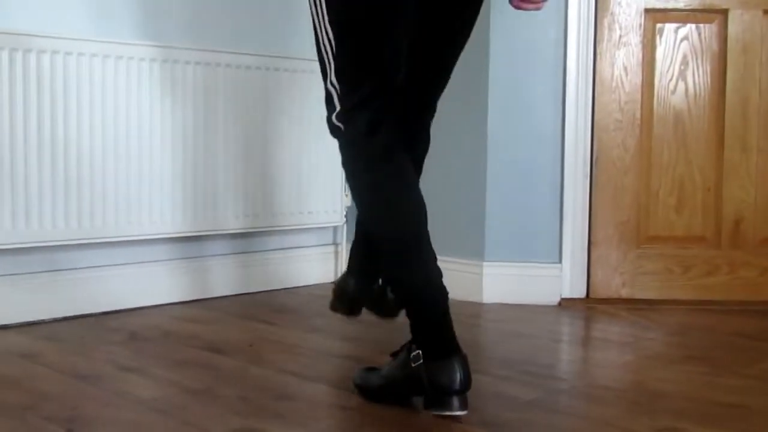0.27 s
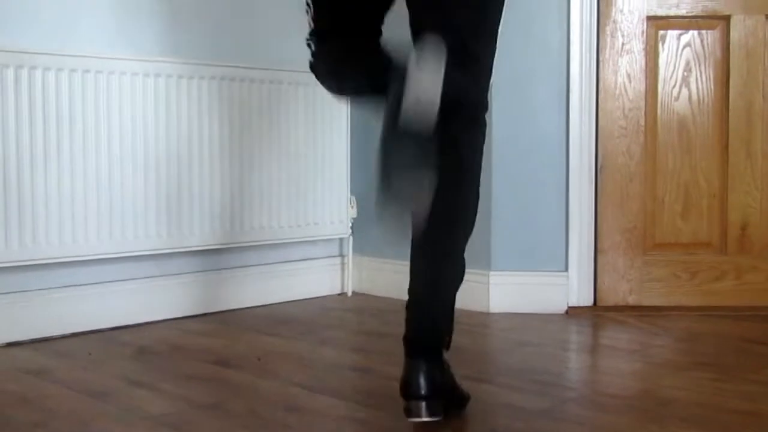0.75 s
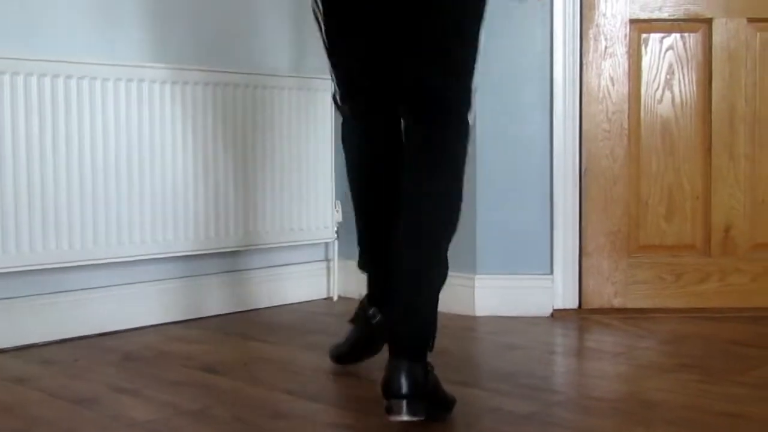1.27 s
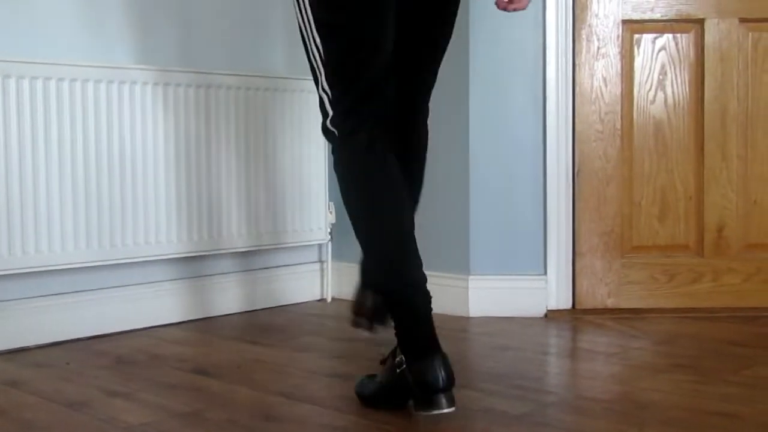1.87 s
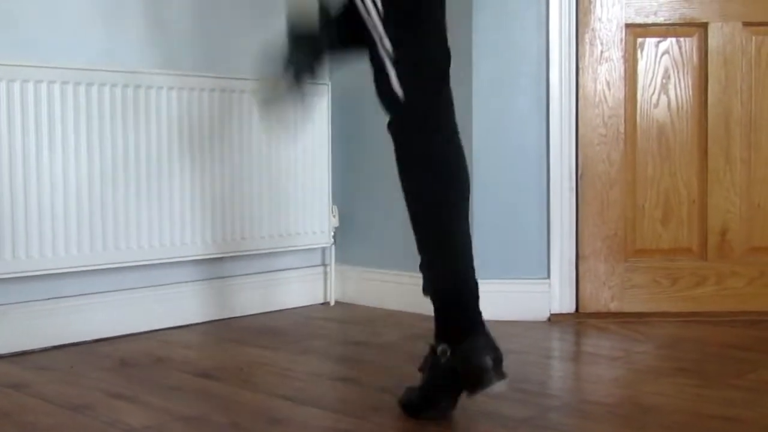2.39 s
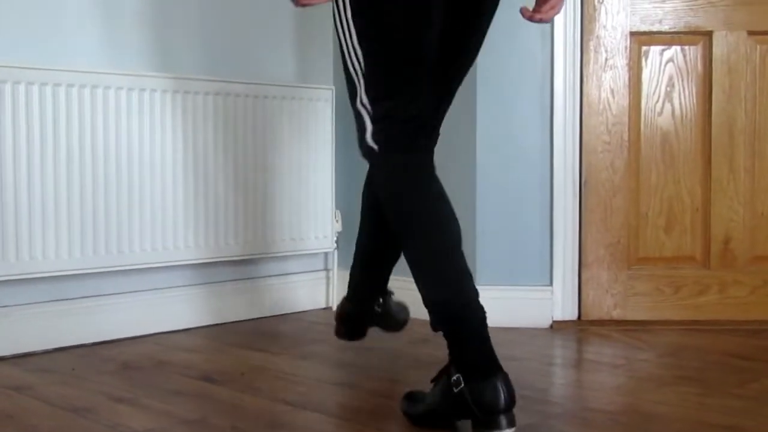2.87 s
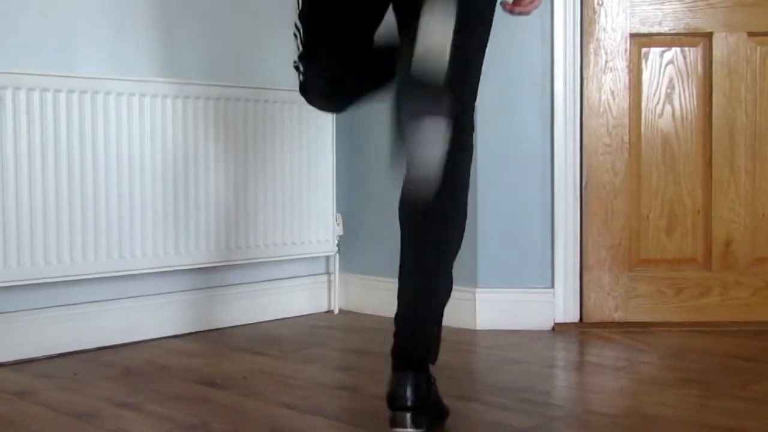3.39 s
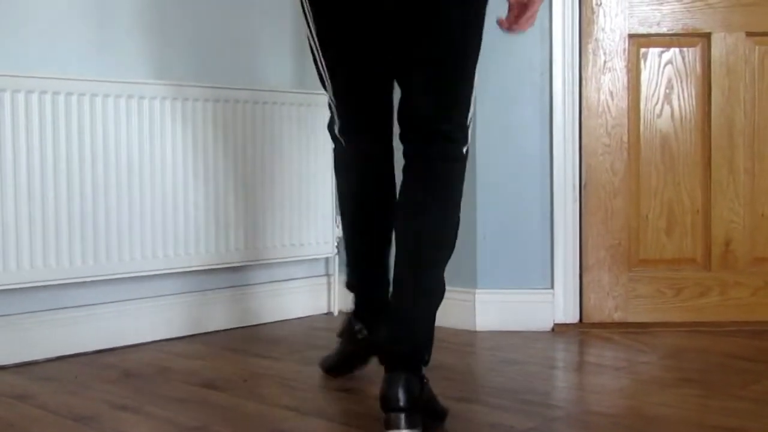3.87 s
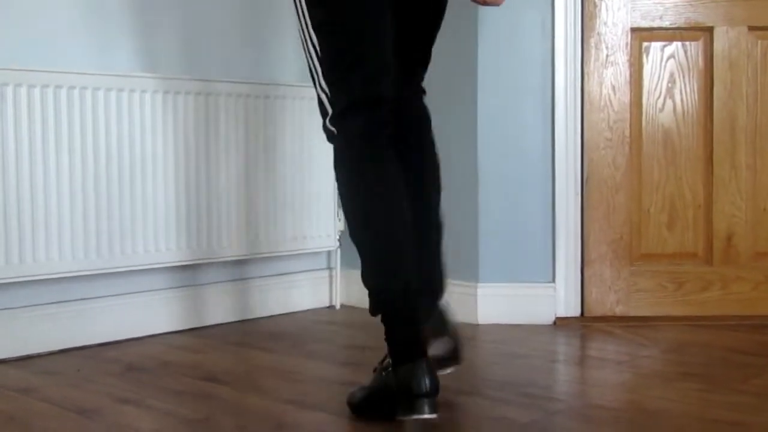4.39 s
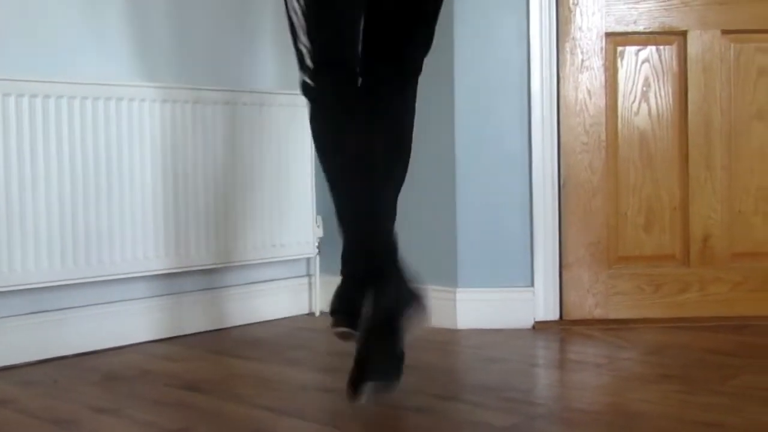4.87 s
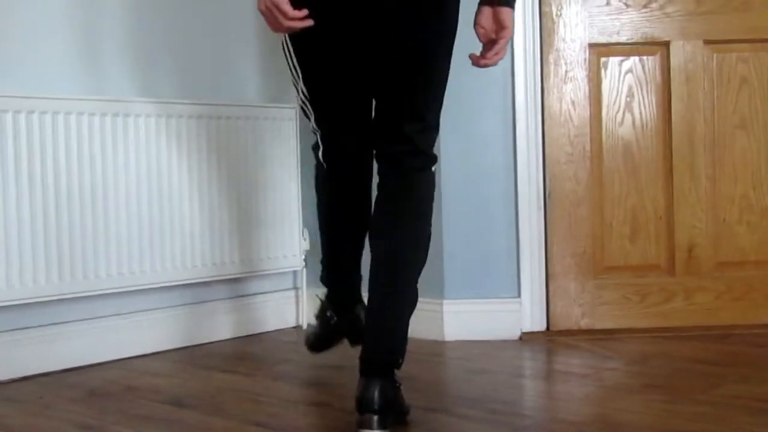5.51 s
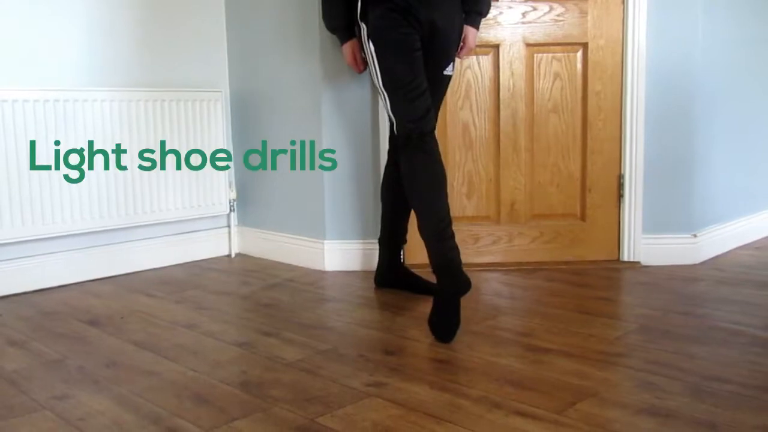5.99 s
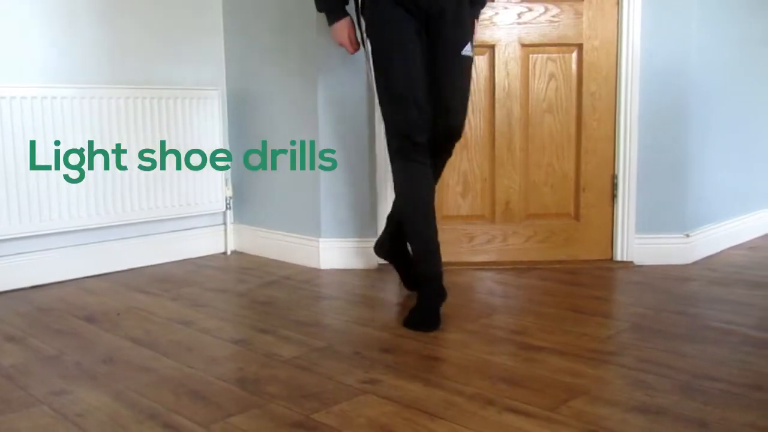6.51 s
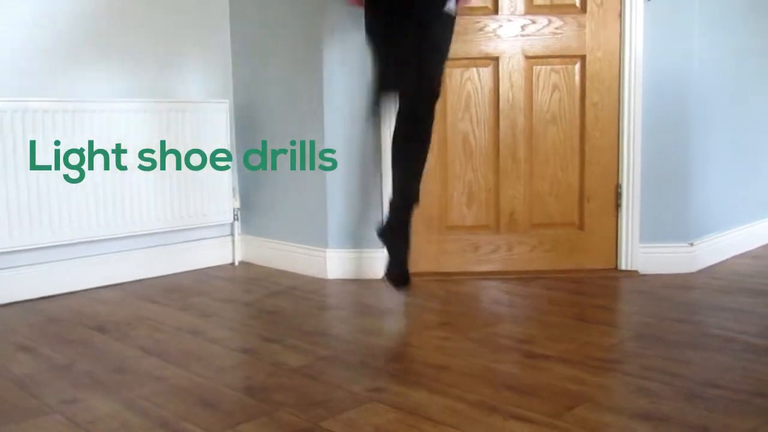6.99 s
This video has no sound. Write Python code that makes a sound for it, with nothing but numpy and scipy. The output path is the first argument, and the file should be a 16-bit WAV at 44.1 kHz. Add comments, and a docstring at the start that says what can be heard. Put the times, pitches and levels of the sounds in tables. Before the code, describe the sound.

A dancer in hard-soled shoes works on a wooden floor in a small, bare, reverberant room. From 0 to 5.5 seconds, loud single blows fall evenly about every 0.3 seconds: hollow stamps and steps, crisp heel and toe clacks, and gritty slaps around 1.8 and 5.3. A longer crunching scrape follows the clicking blow at 2.4. Soft footfalls, brief scuffs and airy trouser swishes come between beats, with duller landings near 1.5 and 4.2. Each blow leaves a boxy tail of about half a second. At 5.5 the sound cuts to dead silence. At 5.7 a slightly brighter hush and faint hum return, with tiny rapid paired ticks until 6.15. Around 6.45 a sock slides softly, then a low muffled landing and small thuds come at 6.6 to 6.7. A light touch at 6.9, faint rubbing and a fuller soft thump at 7.2 end it, heard through a small, bass-thin microphone.

```python
"""In a small, bare room with a wooden floor, a dancer in hard-soled shoes beats an even step.
Each blow rings floor and shoe through resonances: tips clack, flat stamps boom and crunch.
Between the beats feet scuff and trouser legs swish, made of noise with a smooth swell.
After a moment of dead silence there is a faint ticking; the dancer, now in socks, slides a foot out,
springs and lands softly. A steady hush and a little hum lie underneath."""
import sys
import numpy as np
from scipy import signal
from scipy.fft import rfft, irfft
from scipy.io import wavfile
from scipy.ndimage import uniform_filter1d

SR = 44100
rng = np.random.default_rng(int(sys.argv[2]) if len(sys.argv) > 2 else 0)


def output_pcm(signal):
    """Save a mono or channel-first signal as 16-bit PCM at the path in sys.argv[1].

    Samples are clipped to [-1, 1] before scaling.
    """
    pcm = np.clip(np.atleast_2d(signal).T, -1, 1) * 32767
    wavfile.write(sys.argv[1], SR, np.round(pcm).astype(np.int16))


N = 319725
SIZE = 32768  # samples in each single sound and each spectrum
HZ = np.maximum(np.arange(SIZE // 2 + 1) * SR / SIZE, 1)
AGE = np.arange(SIZE) / SR  # seconds since a sound began
TIME = np.arange(N) / SR  # seconds since the scene began


def from_db(db):
    """Turn decibels into a gain."""
    return 10 ** (np.asarray(db) / 20)


def unit(x):
    """Scale a sound to an energy of one."""
    return x / np.sqrt(np.sum(x ** 2) + 1e-20)


def fade(t60):
    """Exponential decay that loses 60 dB in t60 seconds."""
    return np.exp(-np.log(1000) * AGE / t60)


def add(track, s, sound):
    """Mix a sound into the track from second s on."""
    start = int(np.clip(round(s * SR), 0, N - 1))
    track[start:start + len(sound)] += sound[:N - start]


def hump(hz, q):
    """Gain over frequency of a resonance applied twice; a higher q makes it narrower."""
    return 1 / (1 + (q * (HZ / hz - hz / HZ)) ** 2)


def causal(gain):
    """Minimum-phase spectrum with this gain: a sharp front, then the ring."""
    cepstrum = irfft(np.log(gain + 1e-5))
    # fold the second half onto the first, so that nothing sounds before the front
    cepstrum[1:SIZE // 2] *= 2
    cepstrum[SIZE // 2 + 1:] = 0
    return np.exp(rfft(cepstrum))


# Blows of the shoes on the floor. Each row: start in seconds, weight on the boards in dB,
# clack of the tip in dB, grit under the sole in dB, direct sound over room in dB, name of the stroke.
SHOE_BLOWS = [(0.036, 30.5, 16, 4.5, -8.5, "stamp"), (.329, 24.5, 17, -6.5, -9.5, "step"),
              (.6125, 31, 25.5, 0, -2.5, "heel"), (.943, 34.5, 19.5, .5, -9, "stamp"),
              (1.2456, 28.5, 17.5, -1.5, -12, "step"), (1.4843, 32.5, 23.5, -4.5, -4, "toe"),
              (1.8079, 33, 28.5, 8, -14.5, "slap"), (2.141, 23, 27.5, 5.5, -7, "toe"),
              (2.3748, 28.5, 24, -6.5, -4.5, "click"), (2.7167, 35, 19.5, -.5, -10, "step"),
              (2.9624, 26, 20, -7, -11, "step"), (3.2693, 30, 25, 2.5, -8, "heel"),
              (3.5963, 32.5, 14.5, 4, -10.5, "stamp"), (3.878, 33, 20.5, 7, -9, "stamp"),
              (4.1321, 32, 23, -1.5, -3.5, "toe"), (4.433, 29, 22.5, 3.5, -10.5, "dig"),
              (4.725, 23, 17.5, -4, -11.5, "step"), (4.9839, 29, 24, -8, -2, "heel"),
              (5.2888, 32, 21.5, 3.5, -4.5, "slap")]
# Ways a shoe meets the floor. Each named row: thump over boom in dB, knock at usual weight in dB,
# crack over clack at usual weight in dB, clack pitch in Hz,
# time the sole takes to settle in seconds (only its size counts, not its sign).
STROKES = {"step": (2, 24, -17, 1570, .018), "stamp": (-1, 23.5, -2, 1820.5, .024),
           "slap": (-6, 22, -8.5, 1721, 0.01), "dig": (-4.5, 8, -12, 1249, 0.1),
           "heel": (2, 11, -17.5, 1440.5, .002), "toe": (2, 20.5, -15.5, 1690.5, .0022),
           "click": (2, 20.5, -4, 1680.5, -0.3)}
# Broad resonances of the floor: thump, boom and knock. Each row: pitch in Hz, sharpness Q.
FLOOR_RESONANCES = [(171, 1.35), (347, 1.74), (720, 0.93)]
# Sharpness of the shoe's clack, crack and grit, in this order: Q.
SHOE_SHARPNESS = [1.277, 1.9, 0.98]
# Narrow modes of the boards that colour every blow. Each row: pitch in Hz, boost in dB, sharpness Q.
BOARD_MODES = [(683, 2, 12), (970, 1, 12), (1438, 1, 36), (1888, -1.5, 30), (2130, -0.5, 25),
               (3440, -1.5, 30)]
CRACK_HZ, GRIT_HZ = 3420, 6650
# more weight than usual knocks harder, but damps the crack of the shoe: dB per dB of extra weight
USUAL_WEIGHT_DB, KNOCK_GROWS, CRACK_DAMPS = 30, .5, .85


def shoes(bands, waves):
    """Each blow pushes the floor down and rings floor and shoe; a flat sole goes on crunching as it settles."""
    crunch_rough_db, crunch_direct_db, crunch_most = 11.5, -5, .9
    snap_s, flat_s = .011, .011  # rise of the crunch; settling time that gives half of the largest share
    beam_db, beam_hz, beam_q = 6, 3800, .7
    board_direct_db, board_hz = -7, 600
    out = np.zeros(N)
    boards = 1 / (1 + (HZ / board_hz) ** 2)  # near one in the bass, falling towards the treble
    wood = from_db(sum(db * hump(hz, q) for hz, db, q in BOARD_MODES))
    for s, weight_db, clack_db, grit_db, direct_db, stroke in SHOE_BLOWS:
        thump_db, knock_db, crack_db, clack_hz, settle_s = STROKES[stroke]
        extra_db = weight_db - USUAL_WEIGHT_DB
        levels_db = [weight_db + thump_db,
                     weight_db,
                     knock_db + KNOCK_GROWS * extra_db,
                     clack_db,
                     clack_db + crack_db - CRACK_DAMPS * extra_db,
                     grit_db]
        shoe_resonances = zip((clack_hz, CRACK_HZ, GRIT_HZ), SHOE_SHARPNESS)
        resonances = [*FLOOR_RESONANCES, *shoe_resonances]
        *solid, grit = [from_db(db) * hump(hz, q) for db, (hz, q) in zip(levels_db, resonances)]

        # the longer the sole takes to settle, the more of the grit moves from the first snap into the crunch
        crunch_share = crunch_most * settle_s ** 2 / (settle_s ** 2 + flat_s ** 2)
        power = np.sum(np.square(solid), axis=0) + (1 - crunch_share) * grit ** 2
        blow = -causal(wood * np.sqrt(power))  # minus: the floor is pushed down

        # the boards radiate alike for every blow; the shoe beams its crack, more or less towards the microphone
        board_part_db = boards * board_direct_db
        shoe_part_db = (1.5 - boards) * direct_db + beam_db * hump(beam_hz, beam_q)
        direct = causal(from_db(board_part_db + shoe_part_db))
        add(out, s, irfft(blow * (direct + room(bands, waves))))

        settling = (1 - np.exp(-AGE / snap_s)) * np.exp(-(AGE / settle_s) ** 2)
        crunch = friction(settling, *resonances[-1], crunch_direct_db, crunch_rough_db)
        add(out, s, np.sqrt(crunch_share) * from_db(grit_db) * crunch)
    return out


# Soft footfalls and shifts of weight. Each row: start in seconds, level in dB, pitch in Hz.
FOOTFALLS = [(.002, 18, 310), (.462, 29, 164.4), (1.368, 18, 200), (3.136, 20, 213), (3.168, 19, 251),
             (4.85, 16, 180), (6.436, 3, 301), (6.46, 9, 165), (6.606, 17, 175), (6.625, 17, 167),
             (6.68, 19.5, 150), (6.725, 19.5, 120), (6.939, 14, 171), (7.236, 28, 209)]
# Full landings that make the whole floor sag. Each row: start in seconds, level in dB.
LANDINGS = [(1.508, 21), (4.16, 18), (6.659, 29)]
SAG_HZ = 52


def footfalls(bands, waves, q=1.1, direct_db=-9.5):
    """A soft contact wakes only the low boom of the floor, a full landing its deep sag."""
    out = np.zeros(N)
    sags = [(s, db, SAG_HZ) for s, db in LANDINGS]
    for s, db, hz in FOOTFALLS + sags:
        boom = causal(hump(hz, q))
        heard = irfft(boom * (from_db(direct_db) + room(bands, waves)))
        add(out, s, from_db(db) * heard)
    return out


# Trouser legs swish as a leg swings through.
# Each row: strongest moment in seconds, time to swell up in seconds, level in dB.
SWISHES = [(.486, .035, -35), (1.65, .11, -41), (1.847, .022, -27.5), (2.026, .1, -42.5), (3.178, .18, -55),
           (3.568, 0.02, -42), (3.83, 0.061, -48), (4.338, 0.054, -44.5), (4.917, .046, -35.5)]
SWISH_HZ, SWISH_Q = 6900, .28
# A foot, in shoe or sock, grazes the floor in passing.
# Each row: strongest moment in seconds, level in dB.
GRAZES = [(1.624, -33), (3.107, -39), (3.256, -34), (3.797, -31.5), (4.321, -34), (4.699, -34.5),
          (6.939, -45)]
GRAZE_S, GRAZE_HZ, GRAZE_Q = .0045, 8400, .3
# A foot scrapes or briefly touches the floor again.
# Each row: strongest moment in seconds, time to swell up in seconds, level in dB, centre in Hz.
SCRAPES = [(1.257, 0.0022, -28, 8500), (1.367, .03, -40.5, 2900), (1.378, .0038, -23, 2720),
           (1.781, .093, -43, 4790), (2.985, .02, -34.5, 3930), (3.889, .002, -21.5, 6750),
           (4.023, .032, -35.5, 2300), (4.865, .08, -45.5, 5200), (6.937, .0054, -45, 2440)]
SCRAPE_Q = 1.4
# Socks slide over the boards.
# Each row: strongest moment in seconds, time to swell up in seconds, level in dB, centre in Hz.
SLIDES = [(6.455, .035, -42, 1040), (6.555, .16, -42.5, 1600), (6.689, .03, -39, 650),
          (7.01, 0.23, -53.5, 1450), (7.205, .14, -46.5, 1430)]
SLIDE_Q = .35


def scuffs(swish_direct_db=-4.5, touch_direct_db=1.0, touch_s=.006, rough_db=.8):
    """A swell of friction, coloured by what rubs; the briefest touches have more direct sound."""
    out = np.zeros(N)
    rubs = [(*swish, SWISH_HZ, SWISH_Q) for swish in SWISHES]
    rubs += [(s, GRAZE_S, db, GRAZE_HZ, GRAZE_Q) for s, db in GRAZES]
    rubs += [(*scrape, SCRAPE_Q) for scrape in SCRAPES]
    rubs += [(*slide, SLIDE_Q) for slide in SLIDES]
    for s, length, db, hz, q in rubs:
        swell = np.exp(-(2 * (AGE - length) / length) ** 2)
        briefness = 1 / (1 + (length / touch_s) ** 2)
        direct_db = swish_direct_db + (touch_direct_db - swish_direct_db) * briefness
        rub = unit(friction(swell, hz, q, direct_db, rough_db))
        # a longer rub carries more energy; it starts early to peak at s
        add(out, s - length, from_db(db) * np.sqrt(length * SR) * rub)
    return out


# How the room's diffuse tail fades.
# Each row: frequency in Hz, level in dB, time to fade by 60 dB in seconds.
TAIL = [(108.6, -7, 0.55), (200, -5, 0.51), (382, 2.5, 0.64), (700, 0, 0.61), (1404, 1, 0.59),
        (3200, -2.5, 0.64), (6960, 0, 0.51), (13040, -6.5, 0.24)]


def friction(envelope, hz, q, direct_db, rough_db):
    """Tiny slips of uneven size, each from a spot of its own, so their tails merge into a smooth hiss."""
    sizes = from_db(rough_db * np.minimum(rng.exponential(1, SIZE), 5))
    slips, hiss = rng.standard_normal((2, SIZE))
    tail_hz, _, t60 = np.transpose(TAIL)
    # the room stores the energy of the slips and lets it die away
    decay = fade(np.interp(hz, tail_hz, t60))
    stored = signal.fftconvolve(envelope ** 2, decay ** 2)[:SIZE]
    direct = from_db(direct_db) * unit(envelope * sizes * slips)
    tail = unit(np.sqrt(np.abs(stored)) * hiss)
    return irfft(rfft(direct + tail) * causal(hump(hz, q)))


def tail_bands(count=11):
    """Overlapping bands of the diffuse tail, each as (shape over frequency, decay, strength)."""
    hz, db, t60 = np.transpose(TAIL)
    centres = np.geomspace(110, 13000, count)
    bands = []
    for centre, only in zip(centres, np.eye(count)):
        shape = np.sqrt(np.interp(np.log(HZ), np.log(centres), only))
        level_db = np.interp(np.log(centre), np.log(hz), db)
        life = np.interp(np.log(centre), np.log(hz), t60)
        strength = from_db(level_db) * np.sqrt(np.mean(shape ** 2))  # a wider band carries more
        bands.append((shape, fade(life), strength))
    return bands


# Standing waves of the room. Each row: pitch in Hz, level in dB, time to fade by 60 dB in seconds.
ROOM_MODES = [(79.7, -7, .5), (107.6, 0.5, 0.85), (134.6, 3.5, 0.37), (148.4, 1, 0.35), (170.3, -1, 0.43),
              (185, 3, 0.42), (203.2, -1, 0.22), (222, 8, 0.63), (240, 2, 0.38), (255, -5.5, 0.65),
              (293.3, 7, 0.27), (320.4, 4.5, 0.72), (344, -5.5, 0.59), (378, 2.5, 0.8), (390, -0.5, .55),
              (422, 7, .55), (503.3, 8, 0.63)]


def standing_waves():
    """Spectrum of the room's low modes: slowly fading tones, neighbours in opposite sign."""
    waves = np.zeros(SIZE)
    for k, (hz, db, t60) in enumerate(ROOM_MODES):
        decay = 2 * fade(t60) / fade(t60).sum()  # long and short modes peak alike in the spectrum
        waves += (-1) ** k * from_db(db) * decay * np.cos(2 * np.pi * hz * AGE)
    return rfft(waves)


# First echoes off floor, walls and ceiling.
# Each row: usual delay in seconds (it varies a little from sound to sound), level in dB.
ECHOES = [(.0012, -13), (.0036, -21), (.0058, -14), (0.012, -19), (0.0157, -19), (0.0256, -21)]


def room(bands, waves, build_s=.0015, echo_spread=.06):
    """Spectrum of the room's answer from one spot on the floor: echoes, dense tail and standing waves."""
    white = rfft(rng.standard_normal((2, SIZE)))
    build = 1 - np.exp(-AGE / build_s)
    answer = np.zeros(SIZE)
    for k, (shape, decay, strength) in enumerate(bands):
        noise = irfft(white[k % 2] * shape)  # neighbouring bands take different noise
        answer += strength * unit(noise * decay * build)
    for s, db in ECHOES:
        delay = s * SR * (1 + echo_spread * rng.standard_normal())
        answer[int(abs(delay))] += from_db(db)
    return rfft(answer) + waves


def microphone(x, low_hz=45, high_hz=12000):
    """A small microphone: thin in the deep bass, soft at the very top."""
    x = signal.sosfilt(signal.butter(2, low_hz, "high", fs=SR, output="sos"), x)
    return signal.sosfilt(signal.butter(4, high_hz, fs=SR, output="sos"), x)


# When the faint, regular ticking is heard: from and to, in seconds.
TICKING_S = (5.734, 6.15)
TICK_GAP_S, TICK_PAIR_S = .04, .0105  # from pair to pair, and within a pair


def ticking(tick_db=-36.0, spread_db=2, hz=2800, q=2.8, t60=.018):
    """Tiny dry ticks in evenly spaced pairs of uneven strength: short fading noise through a resonance."""
    out, colour = np.zeros(N), causal(hump(hz, q))
    for s in np.arange(*TICKING_S, TICK_GAP_S):
        for lag in (0, TICK_PAIR_S):
            burst = fade(t60) * rng.standard_normal(SIZE)
            tick = unit(irfft(colour * rfft(burst)))
            level_db = tick_db + spread_db * rng.standard_normal()
            add(out, s + lag, from_db(level_db) * tick)
    return out


# Tone colour of the hush of room and microphone; only the balance between the rows counts.
# Each row: frequency in Hz, density in dB per Hz.
HUSH = [(25, -13.5), (45, -10.5), (65, -12.5), (140, -9.5), (350, -13), (570, -14.5), (900, -14),
        (1250, -13), (1800, -22.5), (2800, -25), (6000, -28.5), (8000, -32), (12000, -33), (15000, -37.5)]
# Mains hum and a thin electrical whine, as loud as after the shoe dance.
# Each row: pitch in Hz, level in dB.
HUM = [(49.5, -66), (7246, -76.5), (11763, -81), (11822, -77)]
# The dead silence between the two dances: from and to, in seconds.
SILENCE_S = (5.508, 5.716)
HUSH_DB = -53  # level after the shoe dance
SOFTER_DB, DULLER_DB, DULLER_HZ = -2, -5, 6000  # under the shoes: overall, extra loss of treble, around


def background():
    """Steady hush of coloured noise with a little hum, softer and duller during the shoe dance."""
    hz, db = np.transpose(HUSH)
    bins = np.maximum(np.arange(N // 2 + 1) * SR / N, 1)
    colour = from_db(np.interp(np.log(bins), np.log(hz), db))
    hush = irfft(rfft(rng.standard_normal(N)) * colour, N)
    hum = sum(np.sqrt(2) * from_db(level_db) * np.sin(2 * np.pi * line_hz * TIME)
              for line_hz, level_db in HUM)
    steady = from_db(HUSH_DB) * np.sqrt(N) * unit(hush) + hum
    loss_db = SOFTER_DB + DULLER_DB / (1 + (DULLER_HZ / bins) ** 2)
    duller = irfft(rfft(steady) * from_db(loss_db), N)
    return np.where(TIME < SILENCE_S[0], duller, steady)


def scene():
    """All the footwork in one room, over ticking and background; the shoes stop by the end of the silence."""
    bands, waves = tail_bands(), standing_waves()
    feet = shoes(bands, waves) * (TIME < SILENCE_S[1])
    feet += footfalls(bands, waves) + scuffs()
    return (microphone(feet) + ticking() + background())[None]


def record(dry, ceiling=.97, cutoff_hz=15500):
    """The sharpest peaks are rounded, the sound drops out between the two dances, the top is cut."""
    live = 1.0 * ((TIME < SILENCE_S[0]) | (TIME > SILENCE_S[1]))
    live = uniform_filter1d(live, size=200)  # soft edges of 200 samples
    rounded = dry / (1 + (dry / ceiling) ** 8) ** (1 / 8)
    return signal.sosfiltfilt(signal.butter(24, cutoff_hz, fs=SR, output="sos"), rounded * live)


dry = scene()
out = record(dry)
output_pcm(out)
```